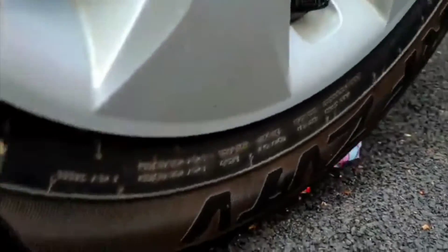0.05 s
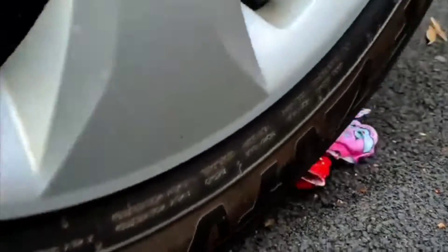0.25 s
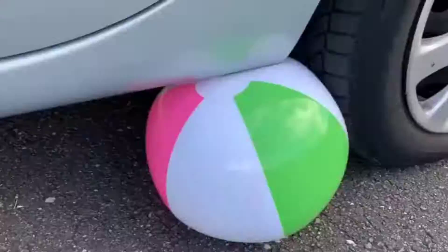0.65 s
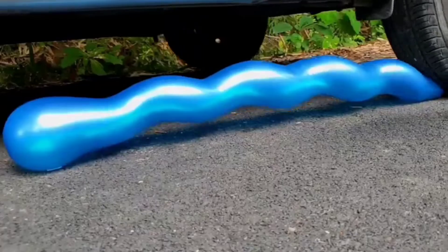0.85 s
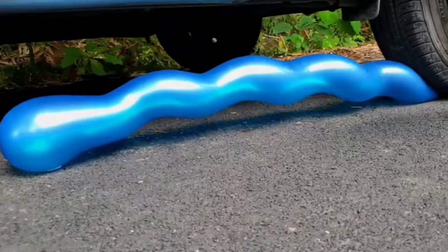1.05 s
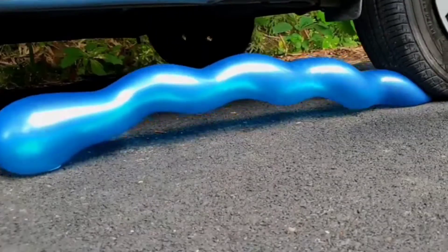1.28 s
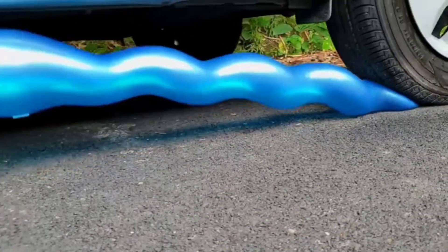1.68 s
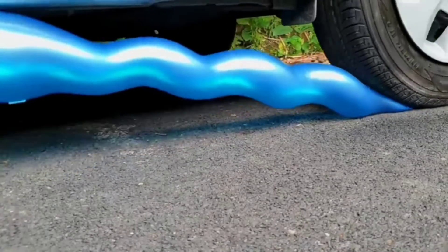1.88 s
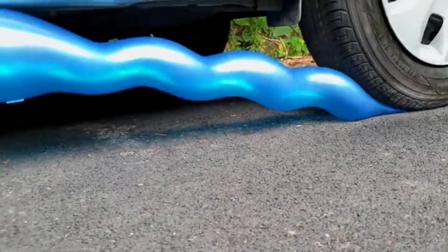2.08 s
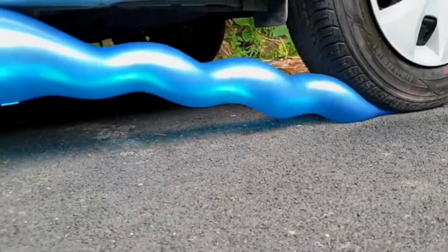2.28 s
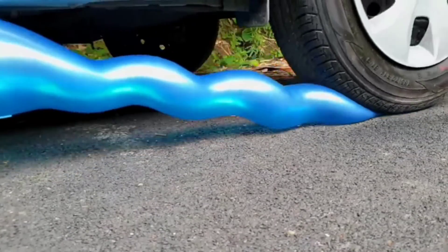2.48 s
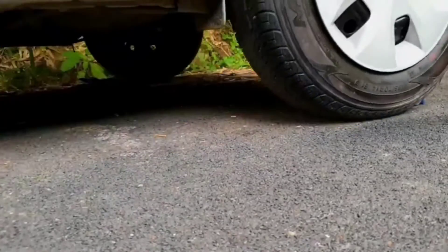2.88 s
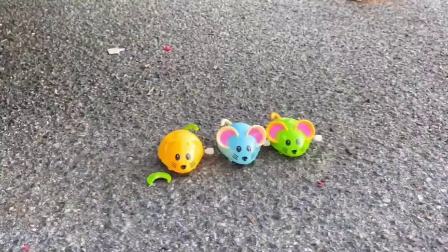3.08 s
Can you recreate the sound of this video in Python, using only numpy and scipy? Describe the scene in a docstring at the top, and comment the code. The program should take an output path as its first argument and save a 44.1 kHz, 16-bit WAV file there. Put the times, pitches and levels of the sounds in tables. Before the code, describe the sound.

A car tyre crushes things close by on asphalt. Small plastic cups hiss and pop sharply in the first 0.4 seconds. After a lull, the engine hums much louder from 0.8 seconds, with a faint whine and crackling grit. A pinched balloon creaks in fits from 1.6 seconds, squeals at 2.8 and bursts loudly just before 3, puffing air at the microphone. Only a faint rumble remains.

```python
"""A tyre crushes cups and a balloon

A car creeps over asphalt, close by. Its tyre squashes small plastic sweet cups, which hiss and pop.
With the engine much louder it pinches a long balloon: stick-slip friction makes the rubber creak and
squeal until it bursts. The burst puffs air at the microphone; afterwards everything is far quieter."""
import sys
import numpy as np
from scipy import signal
from scipy.fft import rfft, irfft
from scipy.io import wavfile

SR = 44100
rng = np.random.default_rng(int(sys.argv[2]) if len(sys.argv) > 2 else 0)


def dump_mix(stems):
    """Bounce the given channels to the path in sys.argv[1] as a 16-bit WAV at rate SR."""
    frames = np.atleast_2d(stems).T  # one column per channel
    limited = np.clip(frames, -1, 1)  # hard clip at full scale
    pcm = np.round(limited * 32767).astype(np.int16)
    wavfile.write(sys.argv[1], SR, pcm)


N = 143325
T = np.arange(N) / SR
HZ = np.maximum(np.arange(N // 2 + 1) * SR / N, 1)
CAR_LAG_S = 0.000398  # right side behind left


# Spectra of the rip and of the escaping air: f/Hz, level/dB
RIP_COLOUR = [(100, 6), (230, 1), (380, 9), (850, 4), (1400, -12), (2100, 0), (4200, -2), (6000, -12),
              (12000, -19), (16000, -26)]
ESCAPE_COLOUR = [(100, -5.5), (400, 2.5), (900, -2.5), (1600, -8), (3000, 0.5), (6000, -1.5), (12000, -5),
                 (16000, -18)]
# Modes of the tearing skin and freed air: f/Hz, level/dB, T60/s
BOOM_MODES = [(125, -13, .05), (400, -13, .05), (800, -10, .018), (2250, -9, .012), (3150, -10, .009)]
def burst(start=2.944, rip_s=0.0032, puff_hz=64.2, puff_rise_s=0.0063, puff_lag_s=0.0048):
    """Sudden pressure release: the skin rips and air escapes, puffing at each microphone port in turn."""
    rip = (T >= start) * np.where(T < start + rip_s, 1, dying(start + rip_s, t60=.014))
    crack = amp(-11) * rip * noise(RIP_COLOUR)
    boom = sum(amp(db) * ping(start, hz, t60) for hz, db, t60 in BOOM_MODES)
    air = amp(-23.5) * dying(start, t60=0.18) * noise(ESCAPE_COLOUR)
    arrival = start + 0.0038
    puff = -amp(-0.5) * ping(arrival, puff_hz, t60=0.071) * ramp(arrival, puff_rise_s)
    return crack + boom + air + np.array([puff, amp(-3) * late(puff, puff_lag_s)])


# Runs of slips under the tread: t/s, T60/s, level/dB, low-pass f/Hz, thud level/dB
SLIP_RUNS = [(1.612, 0.22, -17, 1150, -16.5), (1.662, 0.091, -35, 500, -28.5),
             (1.788, 0.14, -25, 557, -21.5), (2.049, 0.19, -30.5, 447, -25), (2.266, 0.073, -25, 1470, -48),
             (2.331, 0.029, -29.5, 1800, -36), (2.417, 0.12, -29.5, 6100, -47),
             (2.536, 0.096, -24.5, 1202, -48), (2.58, 0.073, -30, 2000, -42),
             (2.618, 0.032, -23.5, 1500, -33), (2.697, 0.063, -26.5, 6000, -46),
             (2.766, 0.068, -11, 1880, -46)]
# Balloon resonances: f/Hz, level/dB, T60/s
BALLOON_MODES = [(198, -18, 0.07), (287, -12, 0.026), (425, -13.5, 0.049), (520.9, -8, 0.043),
                 (730, -6.5, 0.041), (868, -2.5, 0.02), (1100, 1.5, 0.011), (1290, -2.5, 0.0086),
                 (1760, 3, 0.0059), (3280, 6, 0.0015), (4700, -5, 0.009), (6400, 10.5, 0.0014)]
# Spectrum of the thud: f/Hz, level/dB
THUD_SPECTRUM = [(40, 2), (90, 11.5), (170, 2), (250, -3), (350, 7), (550, -1.5), (900, -3), (2000, -74),
                 (8000, -60)]
def creaks(slips_per_s=600, uneven=0.41, scuff_db=-7):
    """Stick-slip friction: dying runs of jerks ring the balloon; the air inside shifts with a thud."""
    slips = np.zeros(N)
    for s, t60, db, dull_hz, _ in SLIP_RUNS:
        jerks = np.zeros(N)
        gaps = rng.uniform(.3, 1.7, 120) / slips_per_s
        at = ((s + np.cumsum(gaps) - gaps[0]) * SR).astype(int) + 1
        jerks[np.minimum(at, N - 1)] = rng.uniform(0.43, 1, len(at)) * rng.choice([-1, 1], len(at))
        slips += amp(db) * signal.lfilter(*signal.butter(1, dull_hz, fs=SR), jerks * dying(s, t60))
    body = amp(scuff_db) * slips
    for hz, db, t60 in BALLOON_MODES:
        drive = slips * (1 + uneven * np.array([drift(550), drift(730)]))
        body = body + amp(db) * ring(drive, hz, t60)
    thud = sum(amp(db) * dying(s, t60) for s, t60, _, _, db in SLIP_RUNS)
    return np.array([body[0], late(body[1], CAR_LAG_S / 2)]) + thud * noise(THUD_SPECTRUM, CAR_LAG_S)


# Squeals: t/s, duration/s, start f/Hz, middle f/Hz, end f/Hz, level/dB, relative pitch jitter
SQUEAL_GLIDES = [(2.782, 0.06, 2370, 2450, 2485, -22.5, .02), (2.831, 0.0405, 2420, 2367, 2354, -26, 0.022),
                 (2.811, 0.05, 1225, 1250, 1324, -28.5, 0.012),
                 (2.863, 0.057, 1230, 1254, 1210, -26.5, 0.0299),
                 (2.868, 0.067, 1800, 1772, 1880, -29.5, 0.074),
                 (2.923, 0.017, 2500, 2590, 2520, -29.5, 0.014)]
# Their harmonics: number, level/dB
SQUEAL_HARMONICS = [(1, 0), (2, -13), (3, -14), (4, -27)]
# Envelope of the rubbing: t/s, level/dB
RUB_LEVEL = [(2.755, -80), (2.77, -19), (2.8, -24.5), (2.86, -34), (2.9, -32.5), (2.93, -28), (2.938, -68)]
# Its spectrum: f/Hz, level/dB
RUB_SPECTRUM = [(150, -11), (500, -6.5), (1000, 4.5), (2700, 1.5), (4000, -8), (7000, -6.5), (9000, -18.5),
                (13000, -16.5), (16000, -47)]
def squeals(waver_db=1.5, edge_s=0.0074, judder_hz=95, judder_depth=.33):
    """Self-excited vibration: tight rubber sings and judders against the tread, over rubbing noise."""
    out = 0
    for s, length, *pitches, db, jitter in SQUEAL_GLIDES:
        glide = np.interp(T, [s, s + length / 2, s + length], pitches)
        phase = turning(glide * (1 + jitter * drift(252)))
        tone = np.sqrt(2) * sum(amp(level) * np.sin(k * phase) for k, level in SQUEAL_HARMONICS)
        out += amp(db + waver_db * drift(180)) * gate(s, length, edge_s) * tone
    out *= 1 + judder_depth * np.sin(turning(judder_hz * (1 + 0.288 * drift(64))))
    return np.array([late(out, .0001), out]) + amp(curve(RUB_LEVEL)) * noise(RUB_SPECTRUM)


# Popping cups: t/s, level/dB, f/Hz, T60/s, crack level/dB, spray level/dB, spray T60/s
CUP_POPS = [(.188, -24.5, 1100, .012, -16.5, -28, 0.038), (.2054, 1, 1246, 0.013, -13, -25, 0.14),
            (0.2359, -7, 713, 0.023, -21.5, -18, 0.068), (0.2576, -4, 1230, 0.0039, -15.5, -21.5, .12),
            (0.3189, -14, 813, 0.012, -22, -32, 0.14), (.416, -35.5, 950, 0.012, -51, -51.5, 0.26)]
# Modes of the thin plastic: f/Hz, level/dB, T60/s
SHELL_MODES = [(1900, -2, .003), (3100, -5, 0.00385), (4100, -5.5, 0.0068), (6200, -6.5, 0.0028),
               (10500, -6.5, .002)]
# Spectrum of the spray: f/Hz, level/dB
SPRAY_SPECTRUM = [(60, -25), (200, -5.5), (600, -1), (1300, 3), (2400, -9), (4200, -12), (6500, -19),
                  (7500, -21), (9000, -18.5), (13000, -23), (16000, -33)]
def pops(lag_s=.00005, crackle_db=2, spray_rise_s=0.003, thin_hz=420):
    """Impulse response: cups too small to radiate bass crack and pop; a crackling spray follows."""
    pop = spray = 0
    for s, pop_db, pop_hz, pop_t60, crack_db, spray_db, spray_t60 in CUP_POPS:
        pop += amp(pop_db) * ping(s, pop_hz, pop_t60)
        for k, (hz, db, t60) in enumerate(SHELL_MODES):
            pop += (-1) ** k * amp(crack_db + db) * ping(s, hz, t60)
        spray += amp(spray_db) * dying(s, spray_t60) * ramp(s, spray_rise_s)
    car_body_echo = amp(-23) * late(pop, 0.0021)
    pop = signal.lfilter(*signal.butter(2, thin_hz, "high", fs=SR), pop + car_body_echo)
    spray *= amp(crackle_db * drift(200))
    return np.array([pop, late(pop, lag_s)]) + spray * noise(SPRAY_SPECTRUM, lag_s)


# Air jets from the cups: peak t/s, rise/s, T60/s, level/dB, whistle f/Hz, relative whistle level/dB
JETS = [(0.04, 0.0039, 0.016, -28.5, 11500, -9), (0.0557, 0.0023, 0.03, -22, 4630, -4),
        (.102, 0.041, 0.15, -27, 3410, -4), (.175, .03, 0.42, -39.5, 4520, -2),
        (0.611, 0.003, 0.04, -64, 3480, 13), (3.162, 0.0012, .02, -60.5, 6670, 11)]
# Spectrum of the cups' hiss and rustle: f/Hz, level/dB
CUP_COLOUR = [(200, -21.5), (450, -6), (750, 1), (1800, -4.5), (3200, 5), (5000, -1), (7500, -6.5),
              (11500, -4), (14000, -12), (16000, -36.5)]
def squirts(width_hz=260, flutter_db=2):
    """Jet noise: air pressed through splits gives a swelling hiss with a broad whistle."""
    hiss, out = noise(CUP_COLOUR), 0
    for s, rise, t60, db, hz, whistle_db in JETS:
        swell = np.exp(-np.minimum(2 * np.abs(T - s) / rise, 20))
        shape = np.where(T < s, swell, dying(s, t60))
        out += amp(db) * shape * (hiss + amp(whistle_db) * whistle(hz, width_hz)) / np.sqrt(2)
    return out * amp(flutter_db * drift(150))


# Low thumps: t/s, f/Hz, level/dB, T60/s
TYRE_THUMPS = [(.237, 224, -23, 0.041), (1.621, 475, -21, 0.1), (1.629, 184, -24, 0.15),
               (1.788, 309, -18, 0.059), (1.794, 165, -18, 0.13)]
def thumps():
    """Damped oscillation: the tyre drops onto the cups, or the balloon gives way."""
    return sum(amp(db) * ping(s, hz, t60) for s, hz, db, t60 in TYRE_THUMPS)


# Faint squeaks: t/s, duration/s, f/Hz, level/dB
SQUEAKS = [(0.457, 0.043, 4200, -63.5), (0.506, 0.051, 4200, -62), (0.574, 0.083, 3490, -62.5)]
# Envelope of the rustle: t/s, level/dB
RUSTLE_LEVEL = [(.4, -79.5), (.47, -72.5), (.67, -73.5), (.71, -88.5)]
def cup_squeaks(width_hz=170, edge_s=0.013, crinkle_db=4):
    """Friction: flattened plastic rustles and squeaks under the tread."""
    out = amp(curve(RUSTLE_LEVEL)) * unit(amp(crinkle_db * drift(150))) * noise(CUP_COLOUR)
    for s, length, hz, db in SQUEAKS:
        out += amp(db) * gate(s, length, edge_s) * whistle(hz, width_hz)
    return out


# Crank rotation rate and pitch of the whine: t/s, f/Hz
CRANK_RATE = [(0, 36), (.4, 35), (.78, 34.8), (.81, 31.9), (2.0, 31.1), (2.29, 30.7), (2.63, 34.6),
              (2.8, 35), (3.25, 33.3)]
WHINE_PITCH = [(.9, 1838), (1.5, 1859), (2.0, 1917), (2.45, 1964), (2.75, 2111), (3.25, 2126)]
# Envelopes of the hum and of the clattering rush: t/s, level/dB
HUM_LEVEL = [(0, -57), (.18, -53), (.26, -35), (.42, -44), (.805, -48.5), (.818, -37), (1.1, -32),
             (2.1, -32.5), (2.35, -29.5), (2.74, -31), (2.79, -47), (2.93, -35), (3.02, -74.5), (3.25, -56)]
RUSH_LEVEL = [(0, -86), (.8, -68.5), (.815, -47.5), (.93, -34), (1.15, -31), (1.55, -30.5), (2.1, -31.5),
              (2.5, -29), (2.74, -28.5), (2.92, -35.5), (3.0, -56), (3.1, -59), (3.25, -59.5)]
# Partials of the hum beside the cups and beside the balloon: multiple of crank rate, level/dB
ORDERS_AT_CUPS = [(1.5, -9.5), (2, -1), (3, -15.5), (3.5, -10.5), (4.5, -24.5)]
ORDERS_AT_BALLOON = [(1, -21), (2, -1), (2.75, -10.5), (3, -3), (4, -10.5), (5, -13), (6, -8), (7, -24),
                     (7.5, -18), (8, -11), (9, -12), (10, -13.5)]
# Spectrum of the rush: f/Hz, level/dB
RUSH_SPECTRUM = [(25, -11), (60, 2.5), (120, -0.5), (200, 2.5), (330, -9.5), (540, -2), (900, -14),
                 (1500, -16.5), (2500, -19.5), (4000, -20), (5500, -27), (7300, -26), (8300, -30),
                 (12000, -28.5), (15500, -39)]
def engine(balloon_from_s=.81, whine_db=-16.5):
    """Periodic excitation: hum at multiples of the crank rate, a rush throbbing each turn, a whine."""
    crank = turning(curve(CRANK_RATE) * (1 + 0.0027 * drift(9.8)))
    def partials(orders, rough):
        out = 0
        for k, db in orders:
            waver = 1 + rough * drift(14) * amp(-db * .8)  # weak partials waver most
            out += amp(db) * waver * np.sin(k * crank + 2 * np.pi * rng.random())
        return np.sqrt(2) * out
    blend = ramp(balloon_from_s, 0.029)
    hum = (1 - blend) * partials(ORDERS_AT_CUPS, rough=0.2)
    hum += blend * partials(ORDERS_AT_BALLOON, rough=0.085)
    hum *= amp(curve(HUM_LEVEL))
    rush = noise(RUSH_SPECTRUM, CAR_LAG_S) * unit(amp(np.sin(crank) + 0.84 * drift(60)))
    whine = amp(whine_db) * whistle(curve(WHINE_PITCH), width_hz=32)
    return np.array([hum, late(hum, CAR_LAG_S)]) + amp(curve(RUSH_LEVEL)) * (rush + whine)


# Envelope of the grit, and single snapping stones: t/s, level/dB
GRIT_LEVEL = [(0, -52.5), (.3, -57), (.45, -76), (.76, -76), (.95, -58), (1.6, -47.5), (2.1, -51),
              (2.45, -46), (2.7, -39.5), (2.92, -39), (3.0, -59), (3.25, -74.5)]
SNAPS = [(1.617, -25), (2.267, -35), (2.4185, -25), (2.582, -30)]
# Their spectra: f/Hz, level/dB
GRIT_SPECTRUM = [(200, -15), (900, 2.5), (2000, -8), (5000, -8), (12000, -11), (16000, -31)]
SNAP_SPECTRUM = [(800, -10), (2500, -3), (6500, -1), (15000, -10)]
def grit(grains_per_s=700, stones_per_s=110, stone_db=-3, ring_cycles=24):
    """Random impacts: fine grit crackles under the tread; stones snap or ring at their own pitch."""
    grains = (rng.random(N) < grains_per_s / SR) * amp(3.5 * np.minimum(rng.exponential(1, N), 2))
    stone_hz = np.geomspace(1100, 4600, 20)
    touches = (rng.random(N) < stones_per_s / SR) * rng.standard_normal((2, N))
    struck = rng.integers(len(stone_hz), size=N)
    stones = sum(ring(touches * (struck == k), hz, ring_cycles / hz) for k, hz in enumerate(stone_hz))
    crackle = noise(GRIT_SPECTRUM, CAR_LAG_S, grains * rng.standard_normal((3, N)))
    snaps = sum(amp(db) * dying(s, t60=0.0087) for s, db in SNAPS) * noise(SNAP_SPECTRUM)
    return amp(curve(GRIT_LEVEL)) * (crackle + amp(stone_db) * unit(stones)) + snaps


# Spectrum of the reflections: f/Hz, level/dB
TAIL_COLOUR = [(100, -15.5), (400, -1.5), (1200, -7), (4500, 2.5), (9000, 4), (16000, -19)]
def yard(x, t60=0.35, tail_db=-16.5):
    """Reverberation: reflections from the car and its surroundings add a faint tail."""
    tail = noise(TAIL_COLOUR) * dying(.006, t60)
    return x + amp(tail_db) * signal.fftconvolve(x, unit(tail) / np.sqrt(N), axes=1)[:, :N]


# Envelope of the background: t/s, level/dB
AMBIENT_LEVEL = [(0, -59.5), (.68, -55.5), (.73, -76), (.78, -51.5), (.85, -46), (3.25, -54.5)]
# Its spectrum: f/Hz, level/dB
AMBIENT_COLOUR = [(25, -0.5), (110, 2.5), (300, -11), (1000, -25), (2200, -35.5), (4000, -24.5),
                  (8000, -40), (16000, -36.5)]
def outdoors():
    """Ambient noise: a faint, low rumble."""
    return amp(curve(AMBIENT_LEVEL)) * noise(AMBIENT_COLOUR)


# Likeness of left and right: f/Hz, shared fraction of power
COHERENCE = [(60, 1), (300, 0.91), (900, 0.32), (2000, 0.25), (4500, 0), (12000, 0)]
def noise(colour, lag=0, source=None):
    """Partial coherence: coloured stereo noise, alike in the bass; the shared part lags on the right."""
    shared, left, right = rfft(rng.standard_normal((3, N)) if source is None else source)
    alike = per_hz(COHERENCE)
    common = np.array([shared, shared * np.exp(-2j * np.pi * HZ * lag)])
    sides = np.sqrt(alike) * common + np.sqrt(1 - alike) * np.array([left, right])
    return unit(irfft(sides * amp(per_hz(colour)), N))


def amp(db):
    """Decibels to gain."""
    return 10 ** (np.asarray(db) / 20)


def unit(x):
    """Normalisation to rms 1."""
    return x / np.sqrt(np.mean(x ** 2) + 1e-20)


def curve(rows):
    """Linear interpolation over time."""
    return np.interp(T, *np.transpose(rows))


def per_hz(points):
    """Interpolation over log frequency."""
    hz, value = np.transpose(points)
    return np.interp(np.log(HZ), np.log(hz), value)


def drift(rate_hz, hop=15):
    """Low-pass noise: random wavering of rms 1."""
    r = np.exp(-2 * np.pi * rate_hz * hop / SR)
    slow = signal.lfilter([1], [1, -2 * r, r * r], rng.standard_normal(N // hop + 1002))[1000:]
    return np.interp(np.arange(N) / hop, np.arange(len(slow)), unit(slow))


def turning(hz):
    """Phase as the integral of frequency, from a random start."""
    return 2 * np.pi * (np.cumsum(hz * np.ones(N)) / SR + rng.random())


def whistle(hz, width_hz):
    """Narrow-band noise around a pitch, independent on each side."""
    phases = (turning(hz) for _ in range(2))
    return np.array([drift(width_hz) * np.sin(p) + drift(width_hz) * np.cos(p) for p in phases])


def ramp(start, rise_s):
    """Linear rise from 0 to 1."""
    return np.clip((T - start) / rise_s, 0, 1)


def gate(start, length, edge_s):
    """Trapezoidal envelope."""
    return np.clip(np.minimum(T - start, start + length - T) / edge_s, 0, 1)


def dying(start, t60):
    """Exponential decay from a sudden start."""
    out = np.zeros(N)
    span = slice(int(np.ceil(start * SR)), int((start + 2 * t60) * SR) + 2)
    out[span] = np.exp(-np.log(1000) * (T[span] - start) / t60)
    return out


def ping(start, hz, t60):
    """Damped sinusoid."""
    return dying(start, t60) * np.sin(2 * np.pi * hz * (T - start))


def late(x, seconds):
    """Time delay."""
    return np.interp(T - seconds, T, x, left=0)


def ring(x, hz, t60):
    """Resonance: one mode driven by x."""
    r, w = np.exp(-np.log(1000) / (t60 * SR)), 2 * np.pi * hz / SR
    return signal.lfilter([.5, 0, -.5], [1, -2 * r * np.cos(w), r * r], x + 1e-18)


# Excess of left over right: f/Hz, level/dB
BALANCE = [(60, 0.8), (250, 2), (1200, 3.5), (2500, 3.5), (4800, 6.5), (8000, 2.5), (14000, 0.5)]
def scene():
    """Superposition: the sources add, and a level difference places them a little to the left."""
    crushing = squirts() + pops() + cup_squeaks() + thumps() + creaks() + squeals()
    mix = yard(crushing) + burst() + engine() + grit() + outdoors()
    return irfft(rfft(mix) * amp(per_hz(BALANCE) * [[.5], [-.5]]), N)


def record(dry, overload=.92, cutoff_hz=15700):
    """Clipping and band limiting: the highest peaks overload; the top treble is cut."""
    low_pass = signal.ellip(10, .1, 80, cutoff_hz, fs=SR, output="sos")
    return signal.sosfilt(low_pass, np.clip(dry, -overload, overload))


dry = scene()
out = record(dry)
dump_mix(out)
```